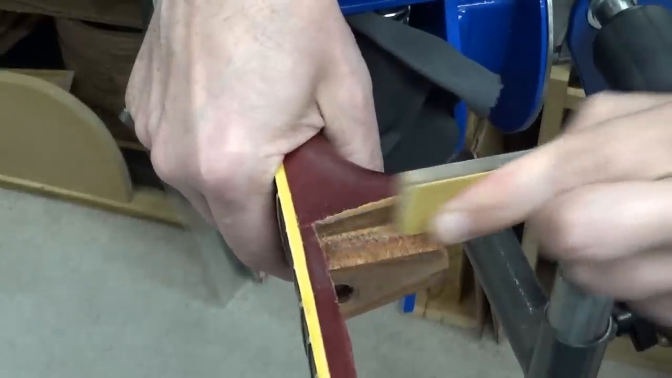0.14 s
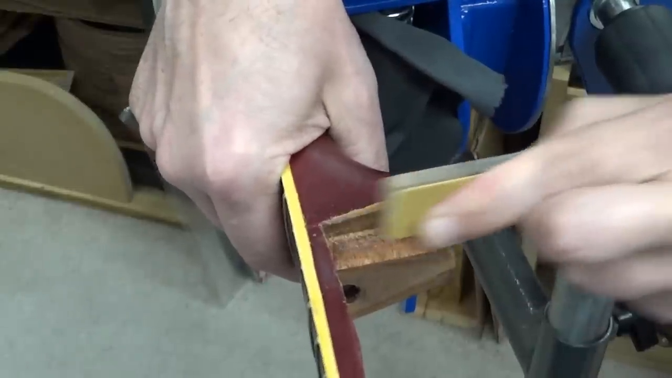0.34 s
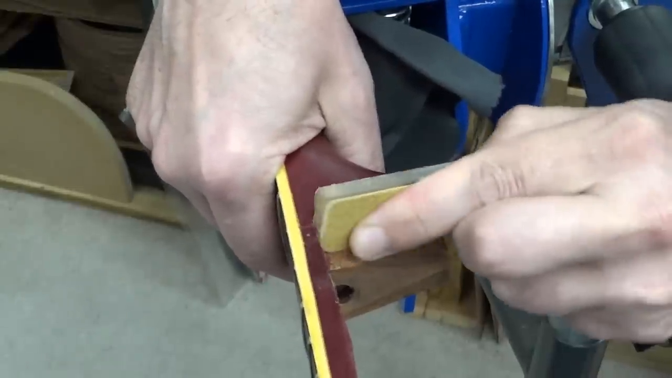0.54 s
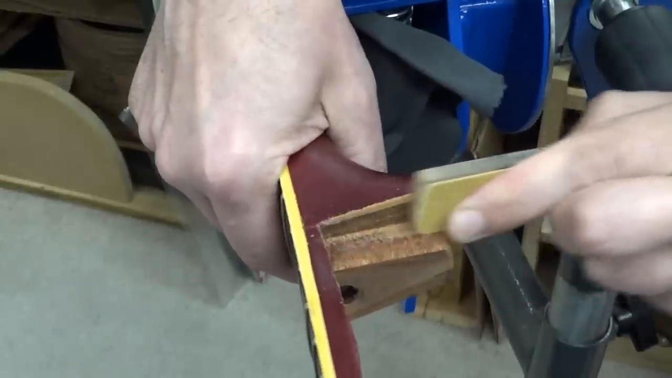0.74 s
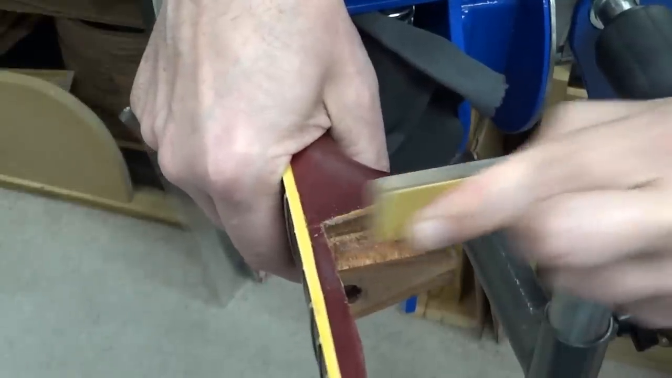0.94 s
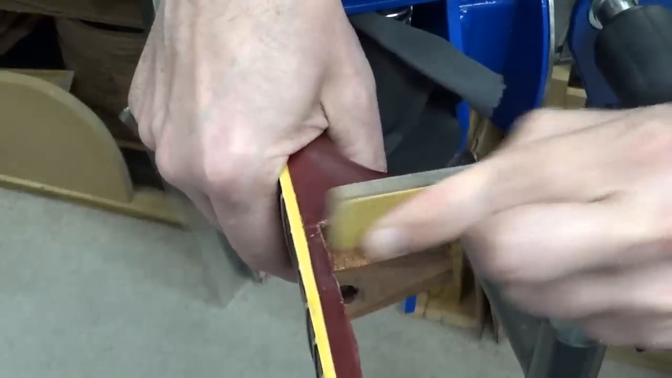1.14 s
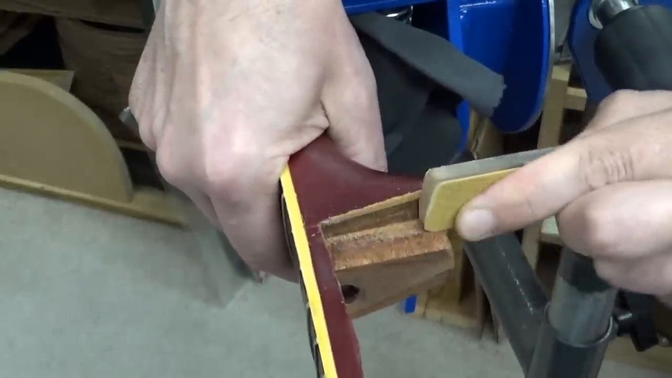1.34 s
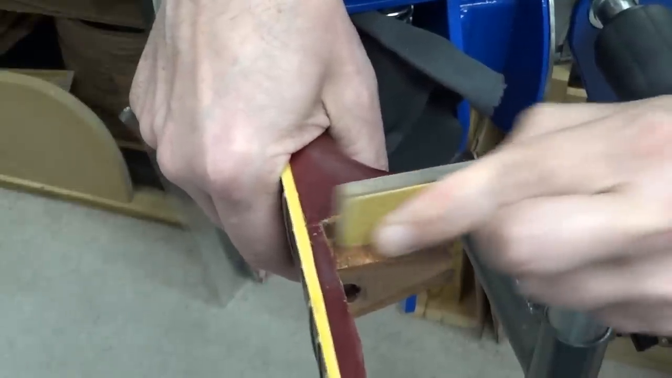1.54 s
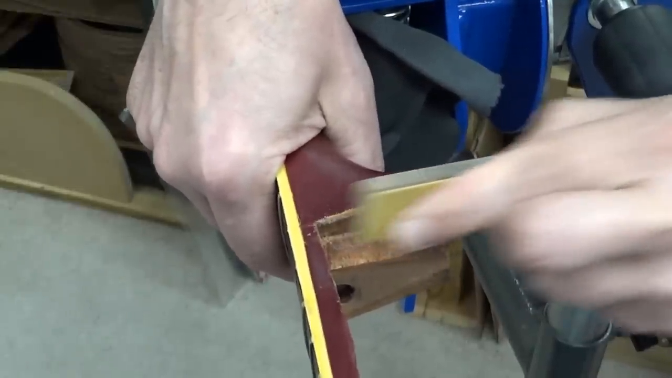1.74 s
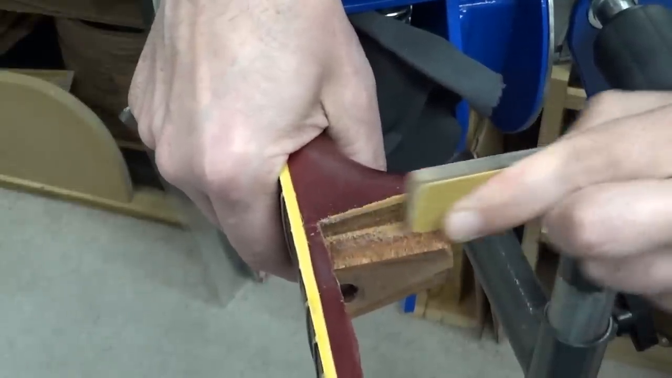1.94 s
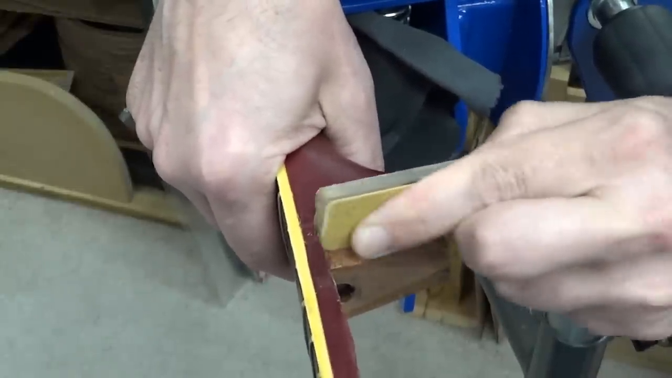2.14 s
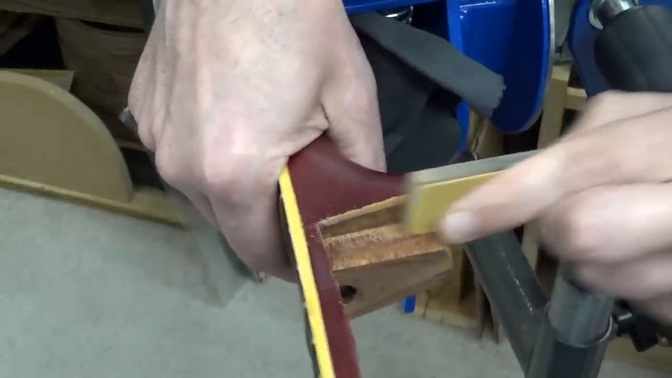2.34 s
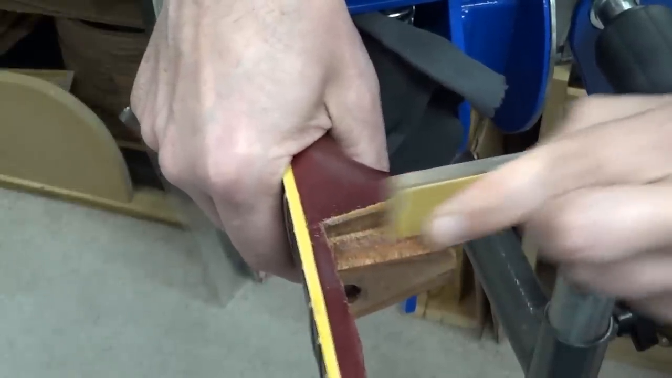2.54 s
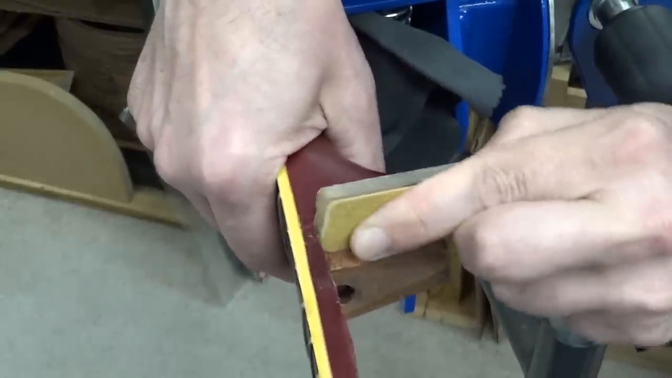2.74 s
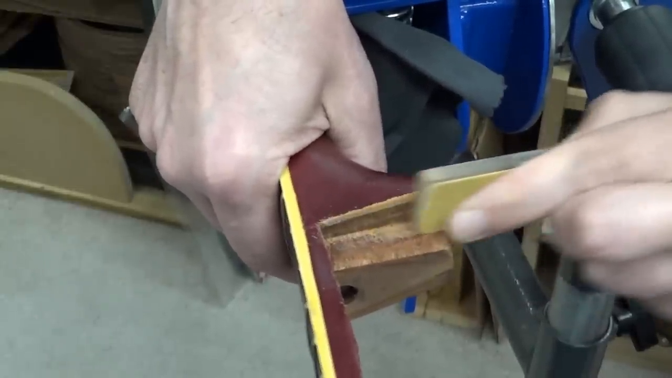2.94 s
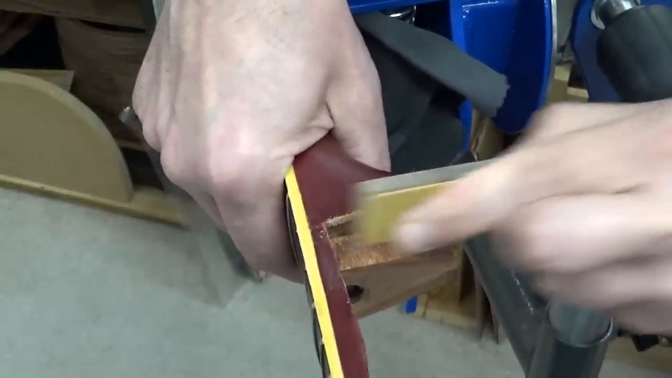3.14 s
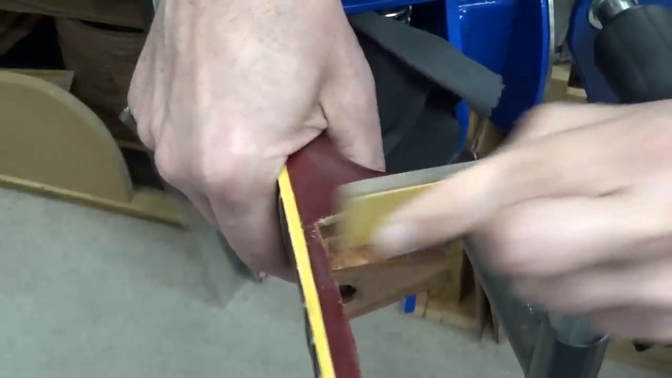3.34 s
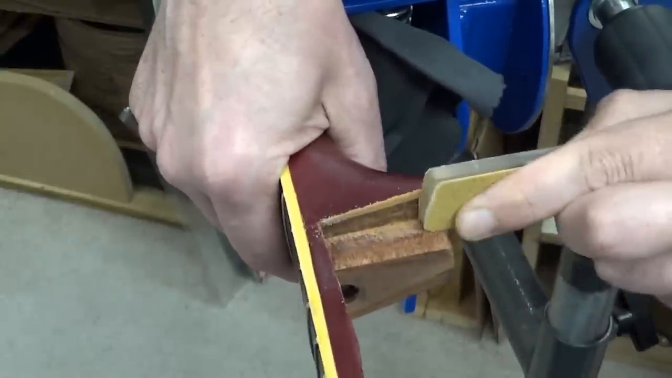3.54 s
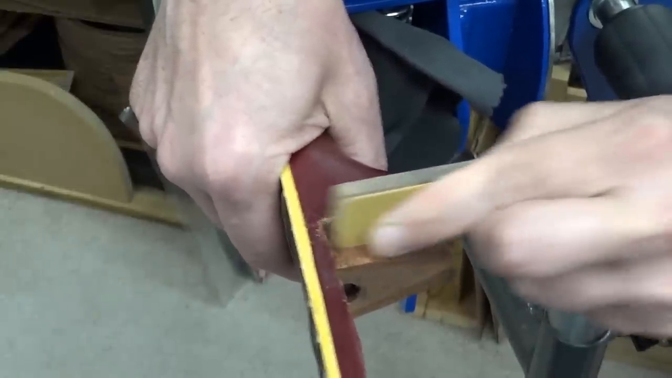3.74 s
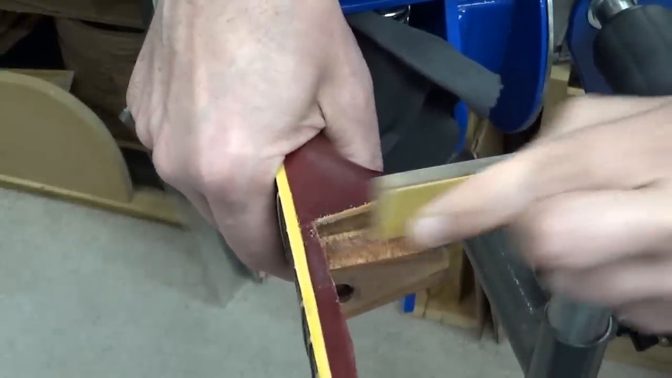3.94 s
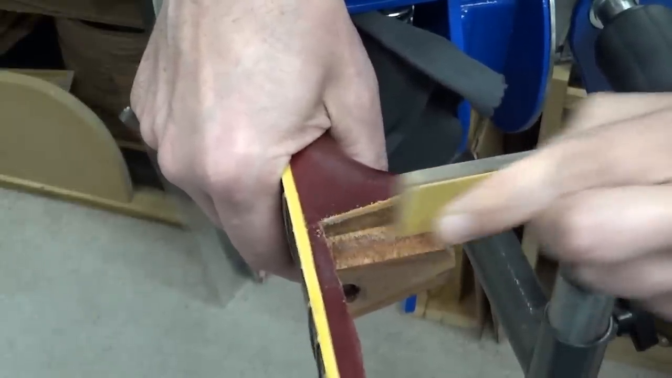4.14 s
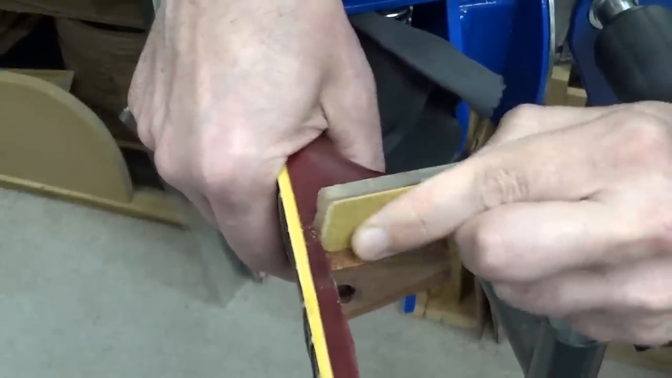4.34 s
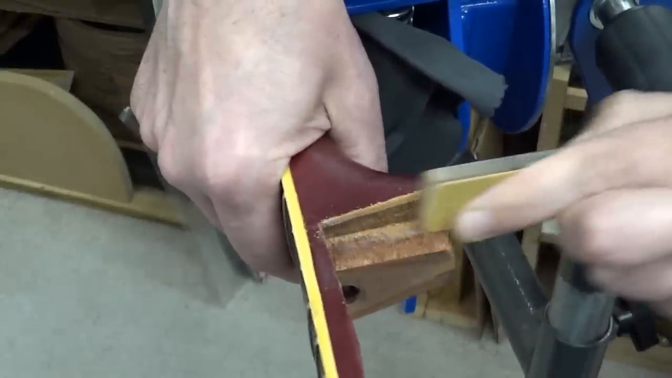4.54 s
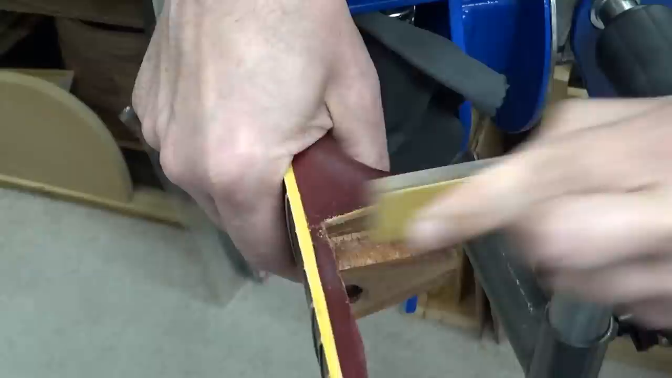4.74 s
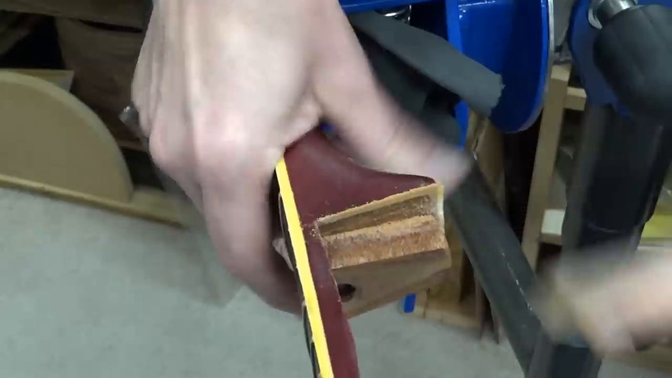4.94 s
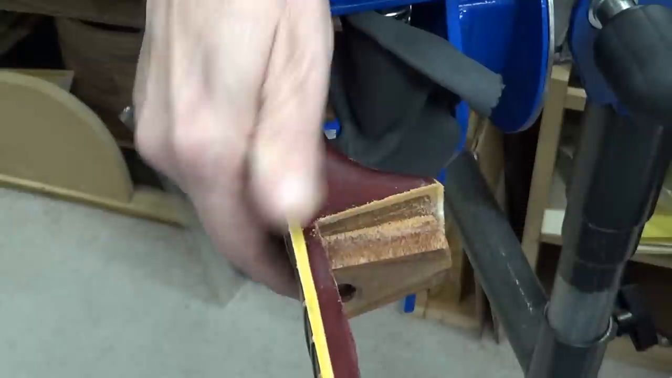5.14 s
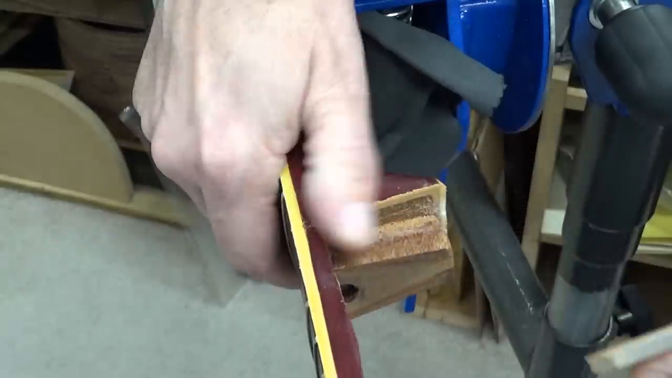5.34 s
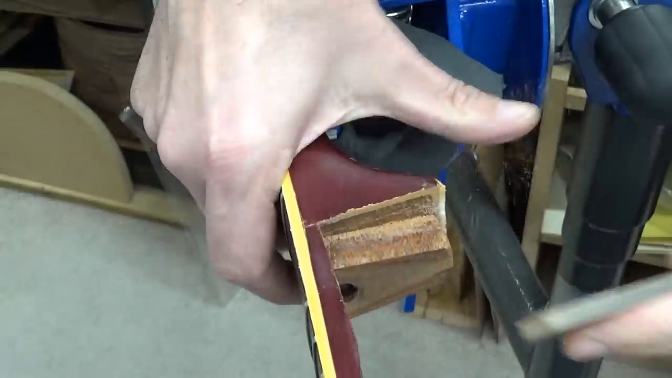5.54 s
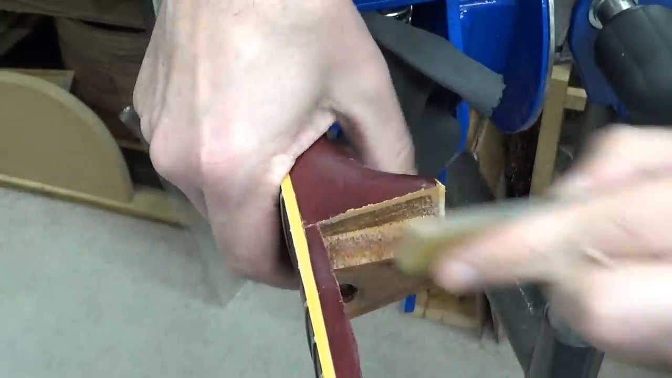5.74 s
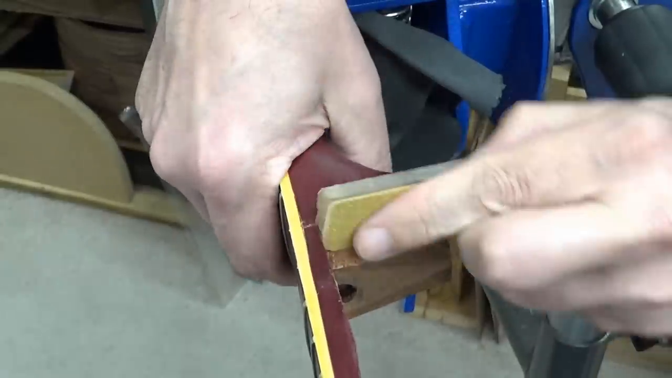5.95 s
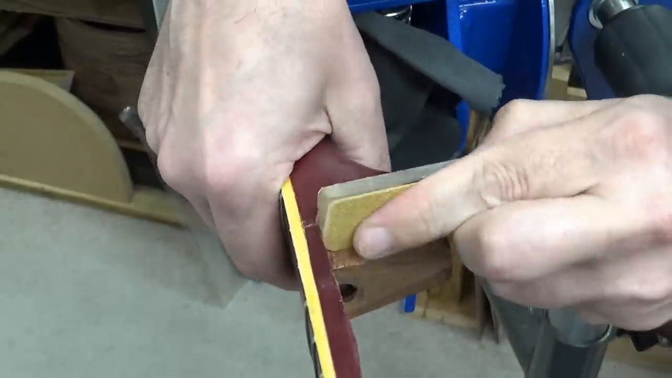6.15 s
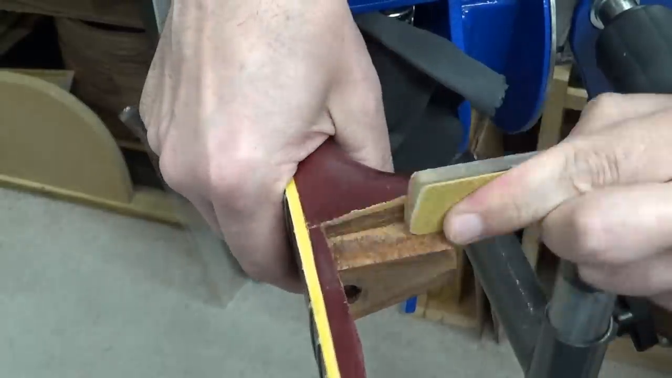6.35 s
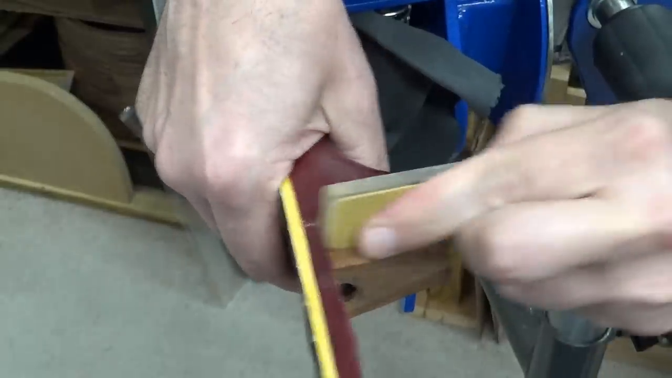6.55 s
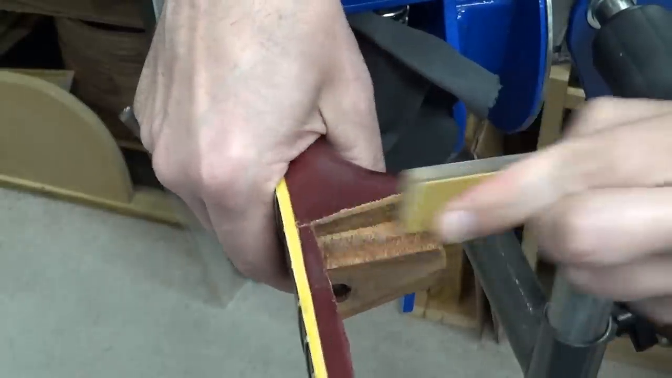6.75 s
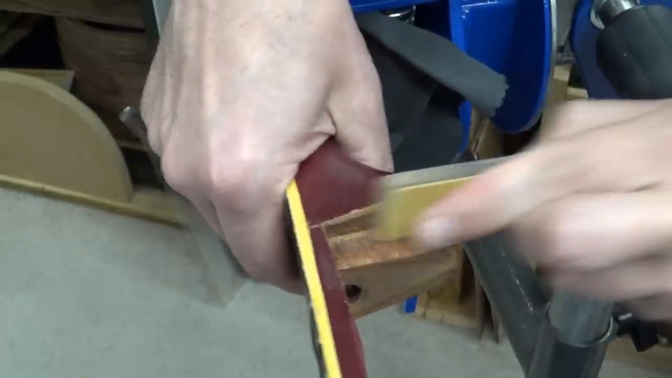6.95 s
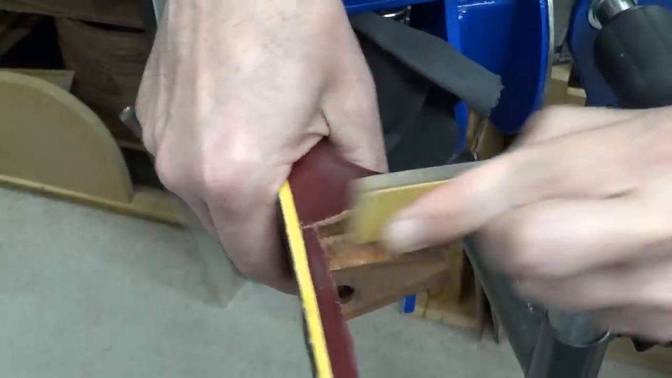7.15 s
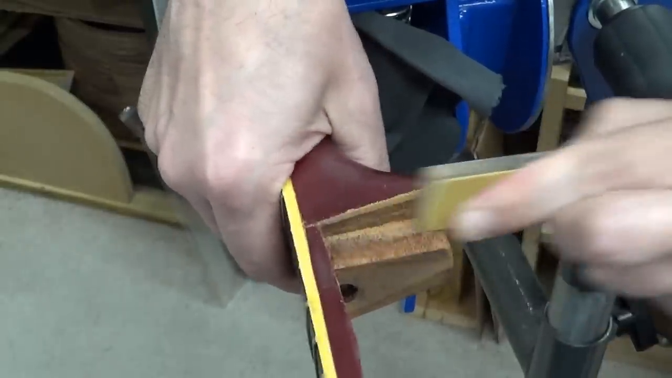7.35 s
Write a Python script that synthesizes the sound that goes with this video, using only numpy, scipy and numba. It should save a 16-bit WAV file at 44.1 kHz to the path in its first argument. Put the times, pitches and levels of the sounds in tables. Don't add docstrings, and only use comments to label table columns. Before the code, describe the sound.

A sanding block rasps briskly to and fro over wood, many pushes ending in a dull knock, with a brief wiping pause over a low fan hum.

```python
import sys
import numpy as np
from scipy import signal
from scipy.fft import rfft, irfft, next_fast_len
from scipy.io import wavfile
from scipy.ndimage import uniform_filter1d
from numba import njit

SR = 44100
rng = np.random.default_rng(int(sys.argv[2]) if len(sys.argv) > 2 else 0)


def ratio_of_db(decibels):
    return 10 ** (np.asarray(decibels, float) / 20)


def wav_out(sig):
    wavfile.write(sys.argv[1], SR, np.round(np.clip(np.atleast_2d(sig).T, -1, 1) * 32767).astype(np.int16))


N = 325899
SIZE = next_fast_len(N + SR)
HZ = np.maximum(np.arange(SIZE // 2 + 1) * SR / SIZE, 1)
TIME = np.arange(N) / SR

# f/Hz, level/dB rms
FAN_HUM = [(91.5, -45), (199.2, -54), (242.2, -55.5), (452.2, -50), (812.9, -60.5), (866.7, -52.5),
           (1244, -66)]
# f/Hz, width/Hz, level/dB
DUCT_RINGS = [(194, 9.1, -7), (890, 82, -25.5), (1300, 75, -29)]
# f/Hz, level/dB per Hz
AIR_COLOUR = [(20, -29), (60, -19), (140, -26), (200, -10.5), (300, -9), (320, -13), (420, -9),
              (540, -15.5), (630, -17), (750, -16.5), (1500, -27.5), (2200, -29.5), (4000, -37),
              (16000, -50)]
# f/Hz, side re mid level/dB
AIR_WIDTH = [(60, -38), (110, -36), (200, -19), (380, -15.5), (700, -11), (1290, -7.5), (2380, -7),
             (4400, -6.5), (8120, -12), (15000, -31)]
BELT_HZ, BELT_WIDTH_HZ, BELT_DB = 2660, 300, -59
BELT_TURNS_PER_S, BELT_SHARP = 29.7, 8

# f/Hz, t60/s
ROOM_T60 = [(200, 0.42), (1500, 0.42), (4200, 0.25), (7000, 0.17), (14000, 0.14)]

# f/Hz, level/dB, t60/s
BENCH_SWAY = [(26.7, -39, 0.72), (41, -43, 0.48), (144.5, -38.5, 0.32), (164, -36, 0.38)]
SHOVE_LAG_S, SHOVE_FOLLOWS = 0.016, 0.34
BENCH_HZ, BENCH_WIDTH_HZ = [28.1, 146], [57, 33]
TREMBLE_DB, TREMBLE_REST_DB, TREMBLE_HOLD_S = [-59.5, -53], [-62, -63], 0.19

# t/s, f/Hz, level/dB
THUMB_SQUEAK = [
    (5.3, 4600, -75),
    (5.315, 4600, -54),
    (5.36, 4650, -62),
    (5.38, 4600, -80),
    (5.4, 4150, -80),
    (5.412, 4150, -51),
    (5.46, 4150, -70),
    (5.48, 4150, -42),
    (5.5, 4080, -80),
]
# t/s, peak level/dB
LAID_BACK = [
    (5.9043, -27),
    (5.9633, -29.5),
    (5.9973, -50),
]
# t/s, peak level/dB
GRAIN_SNAPS = [(0.613, -33), (3.5326, -3), (3.5458, -6), (4.9097, -36), (4.9294, -38), (4.975, -31),
               (5.2494, -46), (5.3395, -40), (5.4779, -31), (6.2487, -30), (6.258, -28), (6.2665, -17),
               (1.262, -18), (7.305, -18)]
# f/Hz, width/Hz, level/dB
SNAP_RINGS = [(4150, 300, 0), (7440, 1500, -2), (10100, 1500, 3)]
# t/s, peak level/dB
SHOULDER_KNOCKS = [(0.263, -6.5), (0.575, -5), (0.891, -8), (1.207, -20), (1.527, -24), (1.828, -7.5),
                   (2.154, -2), (2.476, -6), (2.776, -2), (3.092, -4.5), (3.415, -4.5), (3.722, -12.5),
                   (4.057, -23.5), (4.375, -5.5), (4.696, -21.5), (6.526, -5.5), (6.874, -10.5),
                   (7.227, -22)]
# f/Hz, level/dB, t60/s
STRUCK_MODES = [(833, -12, 0.09), (824, -39, 0.018), (1030, 2, 0.014), (1132, -6.5, 0.028),
                (1151, -5.5, 0.085), (1256, -9, 0.044), (1325, -25.5, 0.022), (1460, -7, 0.054),
                (1504, -16.5, 0.19), (1610, -41, 0.064)]
RATTLE_T60_S, RATTLE_DB = 0.1, -23

# start t/s, fastest t/s, end t/s, grit level/dB, neck re grit level/dB
THUMB_WIPES = [
    (4.993, 5.05, 5.11, -51, 0),
    (5.301, 5.317, 5.36, -41, -15),
    (5.41, 5.478, 5.495, -46, -14),
    (5.9, 5.955, 5.97, -61, 10),
]
# start t/s, length t/s, grit level/dB, neck re grit level/dB
PULL_STROKES = [(0.004, 0.11, -19.5, -6), (0.318, 0.11, -18, -7), (0.635, 0.11, -18, -6.5),
                (0.937, 0.11, -16.5, -8), (1.261, 0.11, -17.5, -9.5), (1.574, .107, -18, -8),
                (1.893, 0.11, -17.5, -9.5), (2.214, 0.12, -17.5, -8), (2.522, .11, -17.5, -6.5),
                (2.833, 0.11, -17.5, -8), (3.158, 0.1, -15.5, -9), (3.471, 0.1, -17.5, -10),
                (3.782, 0.11, -18.5, -9.5), (4.11, .11, -17, -8.5), (4.435, 0.11, -17.5, -9),
                (4.745, 0.12, -17.5, -8.5), (6.263, 0.1, -20.5, -8), (6.604, 0.099, -17, -10.5),
                (6.939, 0.11, -19.5, -7.5), (7.311, 0.1, -16.5, -11)]
# start t/s, rise to top speed t/s, grit level/dB, neck re grit level/dB
PUSH_STROKES = [(0.174, 0.045, -23.5, -3.5), (0.486, 0.067, -24, -5.5), (0.794, 0.059, -23, -4),
                (1.101, 0.05, -25, -4.5), (1.419, .046, -24, -5), (1.733, 0.053, -23.5, -7.5),
                (2.077, 0.05, -21.5, -6.5), (2.385, 0.055, -23.5, -4.5), (2.684, 0.064, -23.5, -6.5),
                (2.992, 0.055, -23, -9), (3.319, 0.039, -21, -9), (3.622, 0.067, -25, -5),
                (3.95, 0.052, -26, -6), (4.281, 0.06, -24, -5.5), (4.59, 0.052, -25.5, -7.5),
                (6.445, 0.053, -25, -8.5), (6.779, 0.031, -25, -10), (7.134, 0.036, -23, -8.5)]
PULL_FASTEST = 0.57
OVERRUN_S = 0.0014
SET_OFF = 1.453
PULL_BLUNT, PUSH_BLUNT, WIPE_BLUNT = (2.2, 2.6), (1.8, 4.0), (2.5, 3.0)

# f/Hz, level/dB per Hz
PULL_COLOUR = [(2200, -16.5), (2600, -8), (3500, -18), (5500, -15), (8000, -11.5), (8800, -28.5),
               (11500, -16), (12500, -26), (16000, -33.5)]
PUSH_COLOUR = [(2200, -11), (2600, -7), (3500, -18), (5500, -11.5), (8000, -4.5), (8800, -17.5),
               (11500, -13.5), (12500, -35), (16000, -50)]
THUMB_COLOUR = [(2500, -22), (5000, -20), (8000, -17), (12000, -20), (16000, -34)]
# f/Hz, width/Hz, level/dB
PULL_RINGS = [(3317, 134, -13), (4154, 177, 5), (4595, 780, -17.5), (6470, 64, 0), (6956, 256, -5.5),
              (8280, 220, -10.5), (9960, 1160, -10.5), (11360, 280, -9)]
PUSH_RINGS = [(3765, 590, -4), (4150, 74, 10), (4600, 190, -19.5), (6910, 224, 5.5), (7780, 130, -45),
              (10080, 690, -0.5)]
WIPE_RINGS = [(4150, 150, -11), (6800, 200, -19), (8700, 230, -20)]
# f/Hz, width/Hz, level/dB
NECK_RINGS = [(543, 50, -32), (772, 25, -2.5), (905, 17, -7.5), (1018, 44, 3), (1067, 140, -2.5),
              (1171, 38, 3), (1378, 86, -5.5), (1527, 31.3, 5), (1576, 79, -0.5), (1924, 29, -0.5),
              (2137, 180, -12.5)]
# start f/Hz, end f/Hz
OVERHANG_HZ, OVERHANG_WIDTH_HZ = [7000, 3500], 1200
OVERHANG_PULL_DB, OVERHANG_PUSH_DB = -24, -6

# f/Hz, side re mid level/dB
WORK_WIDTH = [(200, -23), (400, -8), (1300, -16), (2400, -17), (4400, -16.5), (8000, -33), (11000, -14.5),
              (13000, -3), (15000, 0)]
# f/Hz, left re right level/dB
WORK_LEAN = [(150, 0), (300, -.4), (600, 1.2), (1200, -1.1), (4400, -.6), (9000, -.1)]
PORTS_APART_HZ = 300


def rms_one(x):
    return x / np.sqrt(np.mean(x ** 2) + 1e-20)


def at_hz(points):
    hz, value = np.transpose(points)
    return np.interp(np.log(HZ), np.log(hz), value)


def through(x, response):
    return irfft(rfft(x, SIZE) * response, SIZE)[..., :N]


def resonances(modes):
    total = 0
    for k, (hz, width, db) in enumerate(modes):
        damping = 1j * HZ * width
        total = total + (-1) ** k * ratio_of_db(db) * damping / (hz ** 2 - HZ ** 2 + damping)
    return total


def ring_down(drive, hz, db, t60):
    r, w = ratio_of_db(-60 / (t60 * SR)), 2 * np.pi * hz / SR
    return signal.lfilter([0, ratio_of_db(db) * np.sin(w)], [1, -2 * r * np.cos(w), r * r], drive)


@njit
def gliding(x, hz, r, sr):
    y = np.zeros(len(x))
    for i in range(2, len(x)):
        y[i] = x[i] - x[i - 2] + 2 * r * np.cos(2 * np.pi * hz[i] / sr) * y[i - 1] - r * r * y[i - 2]
    return y


def drift(rate):
    r = np.exp(-2 * np.pi * rate / SR)
    return rms_one(signal.lfilter([1], [1, -2 * r, r * r], rng.standard_normal(N + SR))[SR:])


def clicks(rows, spread_db):
    s, db = np.transpose(rows)
    out = np.full(N, 1e-18)
    out[np.round(s * SR).astype(int)] = ratio_of_db(db + spread_db * rng.standard_normal(len(s)))
    return out


def widen(mid, twin, side_db):
    side = through(twin, ratio_of_db(at_hz(side_db)))
    return np.array([mid + side, mid - side])


def motion(rows, blunt):
    grit, neck, way = np.zeros((3, N))
    for start, peak, end, db, neck_db in rows:
        span = slice(max(int((start - 0.08) * SR), 0), int((end + 0.08) * SR))
        t = TIME[span]
        before = np.maximum(peak - t, 0) / (peak - start)
        speed = np.clip(1 - (before / SET_OFF) ** 2, 0, 1)
        fall = np.maximum((t - peak) / (end - peak), 0) ** blunt[1]
        level = ratio_of_db(db - 12 * fall) * speed ** blunt[0]
        grit[span] += level
        neck[span] += level * ratio_of_db(neck_db)
        way[span] = np.clip((t - start) / (end - start), 0, 1)
    return grit, neck, way


def strokes():
    pulls = [(s, s + PULL_FASTEST * length, s + length, db, neck_db)
             for s, length, db, neck_db in PULL_STROKES]
    pushes = [(s, s + rise, knock + OVERRUN_S, db, neck_db)
              for (s, rise, db, neck_db), (knock, _) in zip(PUSH_STROKES, SHOULDER_KNOCKS)]
    return pulls, pushes


def fan():
    lines = np.zeros(N)
    for hz, db in FAN_HUM:
        level = np.sqrt(2) * ratio_of_db(db + 1.4 * drift(0.45))
        phase = 2 * np.pi * hz * TIME + 0.74 * drift(5.8) + rng.uniform(0, 7.4)
        lines += level * np.sin(phase)
    colour = np.hypot(ratio_of_db(at_hz(AIR_COLOUR)), abs(resonances(DUCT_RINGS)))
    air = ratio_of_db(-42.5) * rms_one(through(rng.standard_normal((2, N)), colour))
    return lines + widen(*air, AIR_WIDTH)


def belt():
    band = through(rng.standard_normal(N), resonances([(BELT_HZ, BELT_WIDTH_HZ, 0)]) ** 2)
    turns = np.cos(np.pi * BELT_TURNS_PER_S * TIME + 0.3 * drift(1)) ** BELT_SHARP
    return ratio_of_db(BELT_DB + 3 * drift(2)) * turns * rms_one(band)


def shop(x):
    t60 = at_hz(ROOM_T60)
    sides = []
    for lags_s in rng.uniform(0.011, 0.043, (2, 8)):
        response = 0
        for k, lag in enumerate(lags_s):
            loop = ratio_of_db(-60 * lag / t60) * np.exp(-2j * np.pi * HZ * lag)
            response = response + (-1) ** k * loop / (1 - loop)
        sides.append(through(x, response))
    return np.array(sides)


def bench(pulls):
    shoves = [(s + SHOVE_LAG_S, SHOVE_FOLLOWS * db) for s, db in SHOULDER_KNOCKS]
    out = np.zeros(N)
    for hz, db, t60 in BENCH_SWAY:
        out -= ring_down(clicks(shoves, spread_db=3.5), hz, db, t60)
    effort = rms_one(uniform_filter1d(motion(pulls, PULL_BLUNT)[0], size=int(TREMBLE_HOLD_S * SR)))
    for db, rest_db, hz, width in zip(TREMBLE_DB, TREMBLE_REST_DB, BENCH_HZ, BENCH_WIDTH_HZ):
        shaking = rms_one(through(rng.standard_normal(N), resonances([(hz, width, 0)]) ** 2))
        out += (ratio_of_db(db) * effort + ratio_of_db(rest_db)) * shaking
    return out


def squeak():
    s, hz, db = np.transpose(THUMB_SQUEAK)
    r = np.exp(-np.pi * 35 / SR)
    tone = gliding(rng.standard_normal(N), np.interp(TIME, s, hz), r, SR)
    return ratio_of_db(np.interp(TIME, s, db, left=-120, right=-120)) * rms_one(tone)


def struck_neck(rows, spread_db):
    out = np.zeros(N)
    fade = ratio_of_db(-60 / (RATTLE_T60_S * SR))
    chatter = ratio_of_db(RATTLE_DB) * rng.standard_normal(N)
    for hz, db, t60 in STRUCK_MODES:
        blow = clicks(rows, spread_db)
        rattle = chatter * signal.lfilter([1], [1, -fade], blow)
        out += ring_down(blow + rattle, hz, db, t60)
    return out


def taps():
    dull = resonances([(1300, 500, 0), (3300, 1500, -3)]) / (1 + 1j * HZ / 3500) ** 2
    crack = through(clicks(LAID_BACK, spread_db=1), dull)
    return ratio_of_db(19.5) * crack + ratio_of_db(-12) * struck_neck(LAID_BACK, spread_db=4)


def ticks():
    response = resonances(SNAP_RINGS) / (1 + (HZ / 12000) ** 8)
    return ratio_of_db(13) * through(clicks(GRAIN_SNAPS, spread_db=1), response)


def knocks():
    padded = signal.butter(2, [750, 2000], "band", fs=SR, output="sos")
    return ratio_of_db(-13) * signal.sosfilt(padded, struck_neck(SHOULDER_KNOCKS, spread_db=1.5))


def halted(left_db):
    stop = np.zeros(N)
    for s, _ in SHOULDER_KNOCKS:
        stop[int(s * SR):int((s + 0.06) * SR)] = left_db
    return ratio_of_db(uniform_filter1d(stop, size=200, origin=99))


def scratches(per_s, spread_db, patchy_db):
    sizes = ratio_of_db(spread_db * np.minimum(rng.exponential(1, (2, N)), 5))
    signs = rng.choice([-1, 1], (2, N))
    caught = rng.random((2, N)) < per_s / SR
    return rms_one(sizes * signs * caught) * ratio_of_db(patchy_db * (drift(8.4) + drift(84)))


def wavering(catches, block, waver_db):
    out = 0
    for k, (hz, width, db) in enumerate(block):
        r = np.exp(-np.pi * width / SR)
        ring = signal.lfilter([1, 0, -1], [1, -2 * r * np.cos(2 * np.pi * hz / SR), r * r], catches)
        out = out + (-1) ** k * ratio_of_db(db + waver_db * drift(5.7)) * (1 - r * r) / 2 * ring
    return out


def overhang(catches, way, ends_hz):
    hz = ends_hz[0] * (ends_hz[1] / ends_hz[0]) ** way * ratio_of_db(0.6 * drift(8))
    r = np.exp(-np.pi * OVERHANG_WIDTH_HZ / SR)
    return ratio_of_db(2 * drift(4)) * rms_one(np.array([gliding(c, hz, r, SR) for c in catches]))


def rub(rows, grit_db, block, overhang_hz, overhang_db, blunt):
    grit, neck, way = motion(rows, blunt)
    catches = scratches(14000, spread_db=2.5, patchy_db=0.8)
    free_end = overhang(catches, way, overhang_hz)
    hiss = through(catches, ratio_of_db(at_hz(grit_db)))
    bright = rms_one(hiss + wavering(catches, block, waver_db=1.4))
    wood = rms_one(through(catches, resonances(NECK_RINGS) / (1 + (HZ / 2600) ** 4)))
    return ratio_of_db(-4) * grit * (bright + ratio_of_db(overhang_db) * free_end) + ratio_of_db(-2) * neck * wood


def scene():
    pulls, pushes = strokes()
    work = rub(pulls, PULL_COLOUR, PULL_RINGS, OVERHANG_HZ[::-1], OVERHANG_PULL_DB, PULL_BLUNT)
    pushed = rub(pushes, PUSH_COLOUR, PUSH_RINGS, OVERHANG_HZ, OVERHANG_PUSH_DB, PUSH_BLUNT)
    work = work + halted(left_db=-7) * pushed
    work = work + rub(THUMB_WIPES, THUMB_COLOUR, WIPE_RINGS, OVERHANG_HZ, -40, WIPE_BLUNT)
    blows = knocks() + taps() + ticks() + squeak()
    near = widen(work[0], ratio_of_db(-4) * work[1], WORK_WIDTH) + blows
    near = through(near, ratio_of_db(at_hz(WORK_LEAN) * np.array([[0.5], [-0.5]])))
    return near + ratio_of_db(-18) * shop(work[0] + blows) + bench(pulls) + fan() + belt()


def roll_off(x):
    return signal.sosfilt(signal.butter(12, 15900, fs=SR, output="sos"), x)


def record(dry):
    mid, side = (dry[0] + dry[1]) / 2, (dry[0] - dry[1]) / 2
    side = signal.sosfilt(signal.butter(1, PORTS_APART_HZ, "high", fs=SR, output="sos"), side)
    top = signal.ellip(10, 0.5, 70, 15750, fs=SR, output="sos")
    mix = signal.sosfilt(top, [mid + side, mid - side])
    return roll_off(mix)


dry = scene()
out = record(dry)
wav_out(out)
```